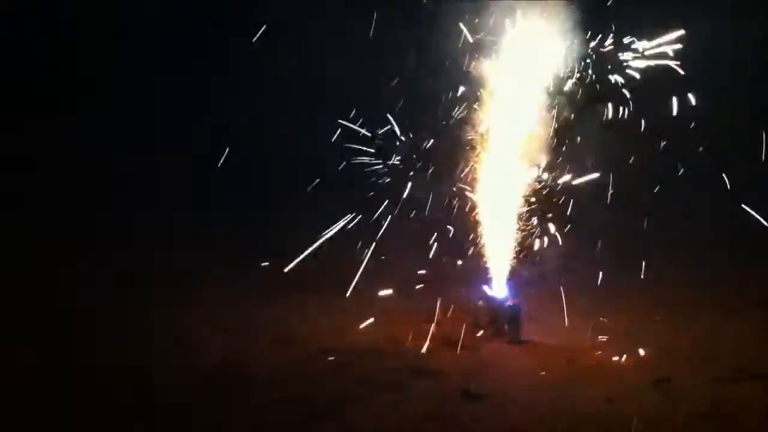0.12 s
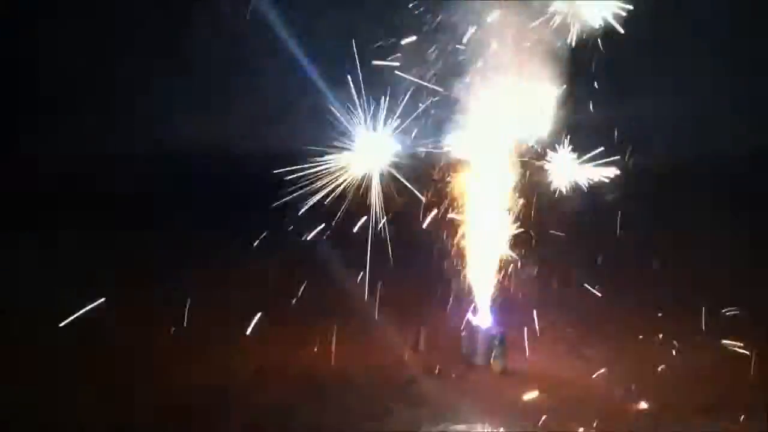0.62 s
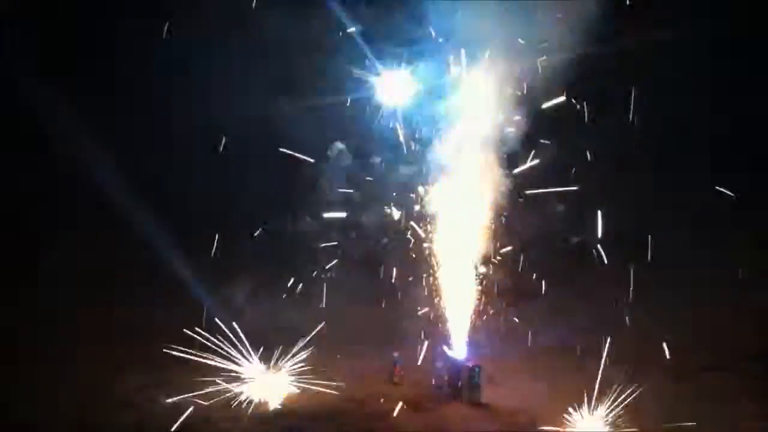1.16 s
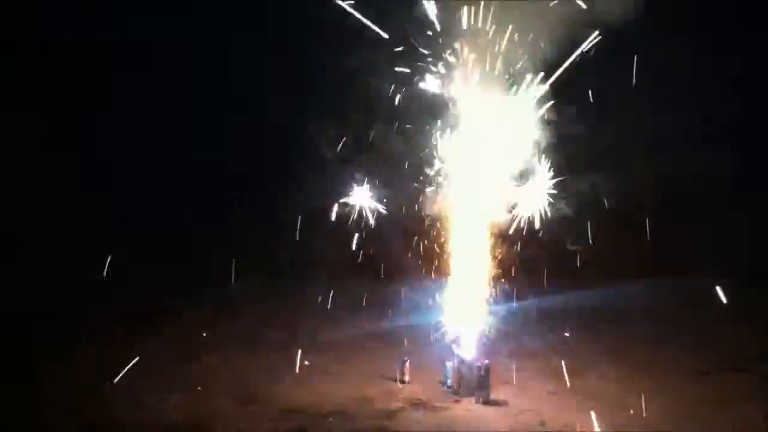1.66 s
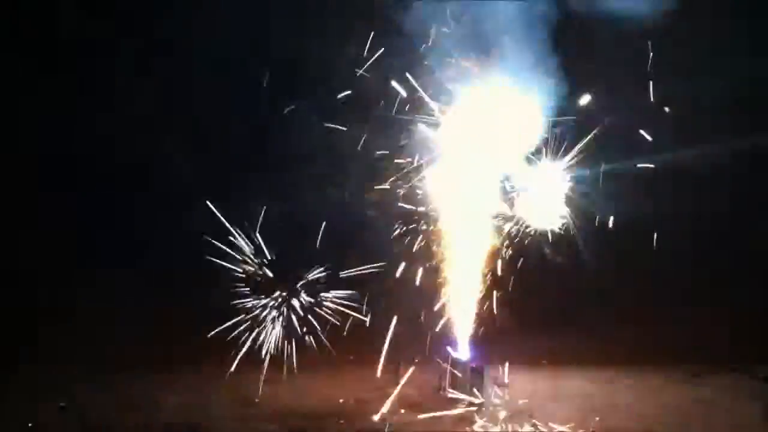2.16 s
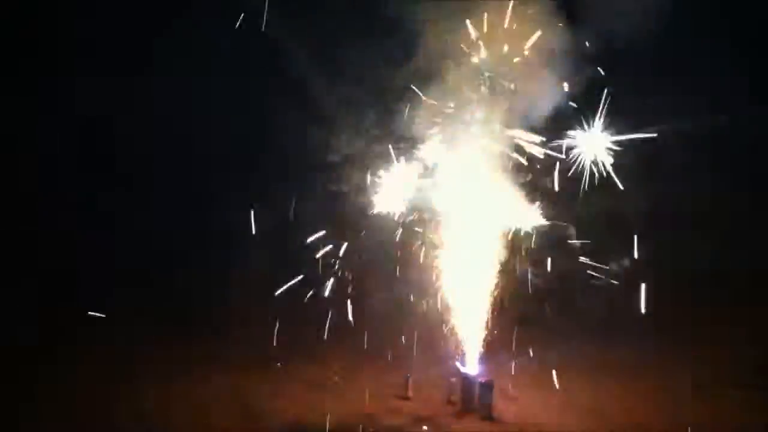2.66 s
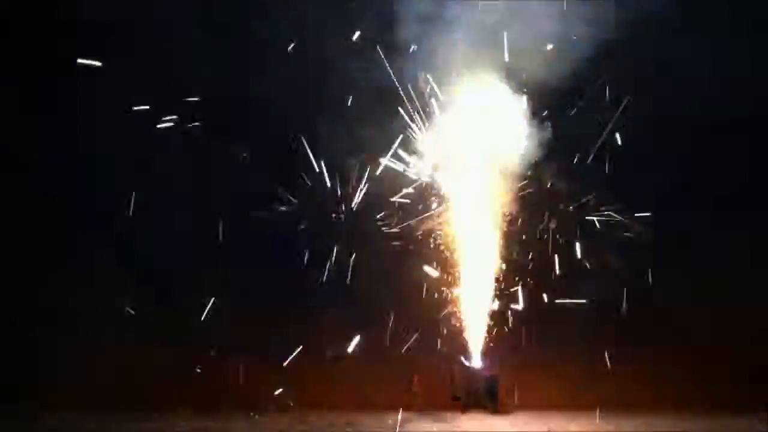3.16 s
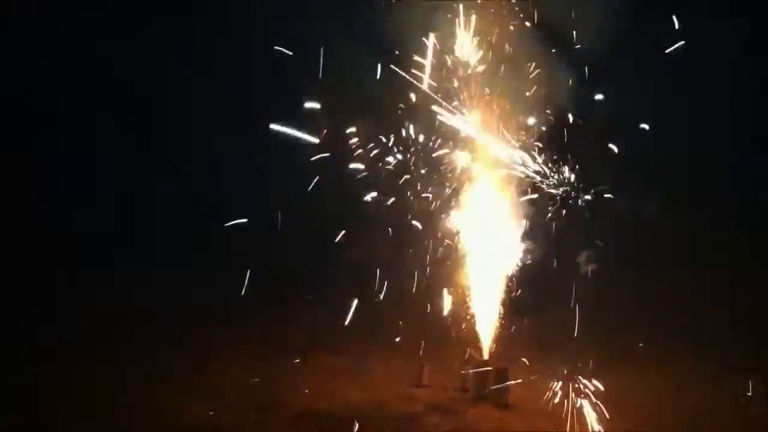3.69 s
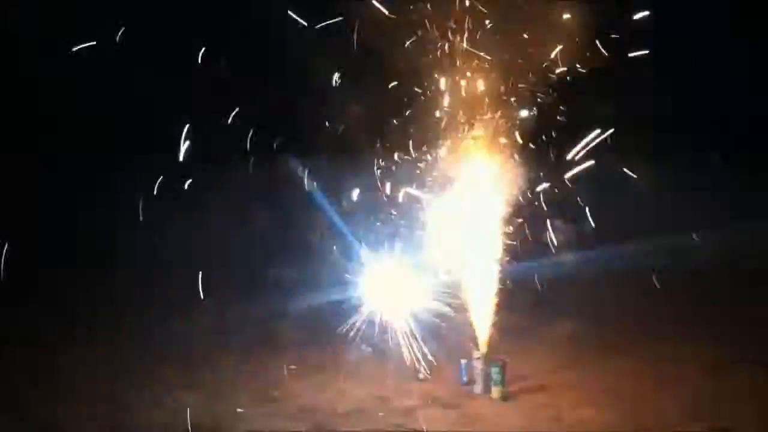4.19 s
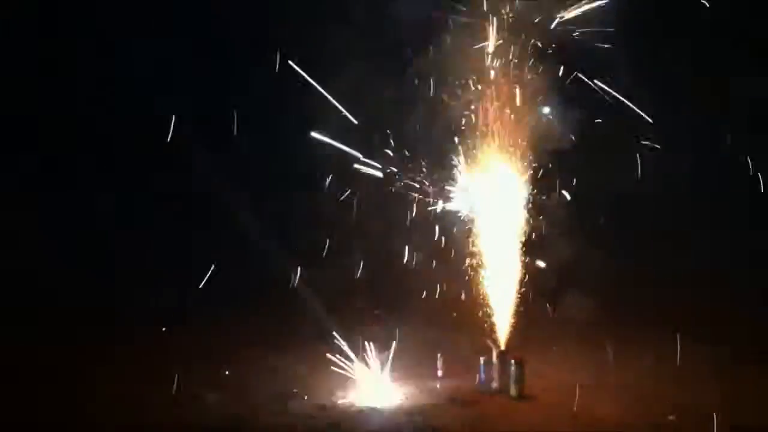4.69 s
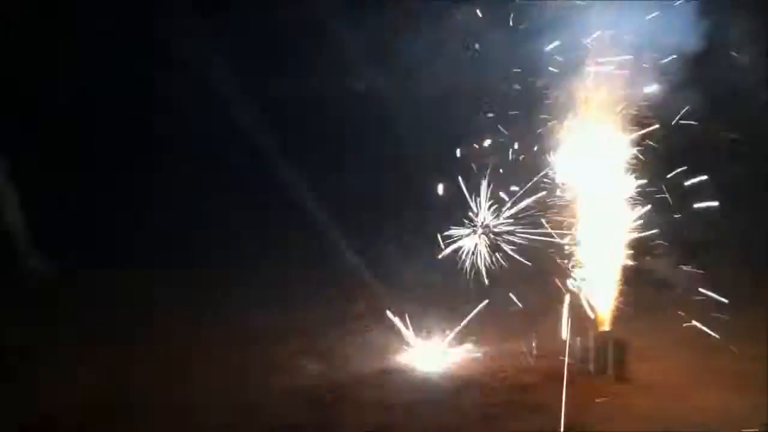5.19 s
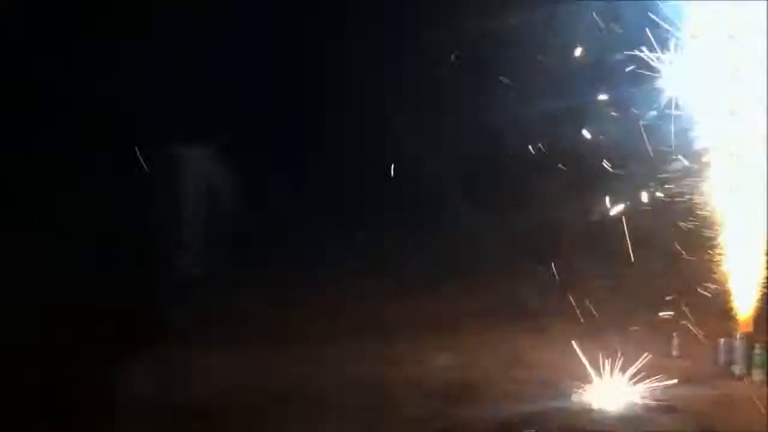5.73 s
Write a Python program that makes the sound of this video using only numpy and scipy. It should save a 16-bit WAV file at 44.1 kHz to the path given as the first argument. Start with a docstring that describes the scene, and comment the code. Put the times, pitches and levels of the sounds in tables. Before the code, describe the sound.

A fountain firework burns on open ground at night, a few metres from a phone microphone. At 0 s an earlier burst is still sizzling away, with a few small crisp ticks. From about 0.2 s the pops grow, and by 0.45 to 1.1 s they are a dense, loud volley of sharp cracks. Things thin briefly around 1.1 to 1.3 s and again at 1.5 to 1.8 s, leaving small ticks and hiss, then irregular clusters resume, rounder and punchier. Each pop is a tight double snap, milliseconds apart, trailing a very short buzz and bright sizzling sparks. An especially hard bang lands near 3.3 s. Strong blasts overload the microphone and add dull, low, quickly ringing thumps. Behind everything run faint distant crackles, a quiet fluttering jet hiss and barely audible low rumble. Dense crackling continues from 4.8 s until the cut at about 5.8 s.

```python
"""A ground fountain firework burns on bare earth at night, a few metres from a phone. An earlier burst is still
sizzling as stars begin to crackle, crisp at first, then mostly rounder. Each snaps twice as a tiny shock, the
ground echo or the louder burst itself coming second, and sprays sizzling sparks shaped from noise. The jet,
fluttering noise, hisses behind. After the loudest shocks the signal thumps off centre and rings low through a
resonant bass cut."""
import sys
import numpy as np
from scipy import signal
from scipy.fft import rfft, irfft
from scipy.io import wavfile
from scipy.ndimage import uniform_filter1d

SR = 44100
rng = np.random.default_rng(int(sys.argv[2]) if len(sys.argv) > 2 else 0)


def generate_wav(sig):
    """Save sig (samples, or channels by samples) to the path in sys.argv[1] as 16-bit PCM at SR."""
    pcm = np.round(np.clip(np.atleast_2d(sig).T, -1, 1) * 32767).astype(np.int16)
    wavfile.write(sys.argv[1], SR, pcm)


def gain_from_db(level_db):
    """Turn a decibel level (scalar or array-like) into a linear amplitude factor."""
    decades = np.asarray(level_db, float) / 20
    return 10 ** decades


N = 257544
TIME = np.arange(N) / SR

# star bursts, relative levels: start_s, peak_db, second_snap_lag_ms,
# second_snap_db (re first; ground echo, or the louder burst itself), spark_spray_db
STAR_BURSTS = [(0.0231, -13.5, 1.3, -10.0, -41), (0.0899, -15, 0.39, -20.0, -46),
               (0.1263, -28, 0.57, -10.0, -43.5), (0.2017, -8, 1.26, 1, -34),
               (0.2359, -8.5, 2.6, -3.5, -37), (0.2944, -6.5, 1.55, -2.5, -33), (0.3108, -4, 3.03, 4, -30),
               (0.4458, -0.5, 1.08, 1, -26), (0.4599, -0.5, 0.26, -3, -28), (0.473, -2, 1.29, -4, -32),
               (0.493, 3.5, 1.7, -8, -27.5), (0.5456, -5.5, 2.97, 4, -31), (0.5784, -9, 3.5, -5, -40),
               (0.5997, -2.5, 1.86, -11, -36), (0.6479, -4, 2.1, -4.5, -26.5),
               (0.6687, -7, 2.4, -12.0, -57.0), (0.6944, -4, 1.32, 10, -23.5),
               (0.7056, 0.0, 1.25, -13, -27), (0.71, -6, 1.6, -13.0, -32), (0.7289, -3.5, 0.97, 8.5, -23),
               (0.7702, -17, 0.59, -5, -29.0), (0.8303, -3.5, 1.7, 0, -18), (0.856, -1, 1.5, -6, -26),
               (0.875, 0, 1.8, 1, -26.5), (0.9257, -4.5, 1.9, -2.5, -30), (0.9739, 0, 2.3, -4.0, -25),
               (0.9806, -15, 0.35, -9.0, -23), (1.0235, -0.5, 2.96, -4, -26.5),
               (1.051, -2.5, 1.5, -15, -29), (1.056, -15, 1.2, -15.0, -34),
               (1.081, -18.0, 0.55, -16.0, -23.5), (1.0895, 0, 1.97, -3, -27),
               (1.1548, -32, 0.33, -9.5, -34), (1.22, -23.5, 0.37, -6, -47), (1.2835, -8.5, 0.6, 3.5, -35),
               (1.3025, 0.5, 1.4, 3.5, -24), (1.3447, -7, 3.6, 8.5, -24), (1.382, -9, 0.89, -9.0, -34),
               (1.3941, 3, 2.2, -9, -23), (1.433, -18, 0.8, -13.0, -37), (1.4757, -12, 0.34, -3.0, -31.5),
               (1.502, 0.5, 2.74, -4, -28), (1.5254, -29, 0.36, -18.0, -31), (1.6357, -18, 0.48, -21, -43),
               (1.7888, -28, 1.2, -14.0, -54), (1.8093, -15.5, 2, -1, -34), (1.823, 1.5, 0.59, -4.5, -28.5),
               (1.8465, -10, 1.3, -9.0, -70.0), (1.8875, 0, 0.7, -3, -27), (1.8911, -0.5, 2.8, -7, -36),
               (1.8959, 0, 0.36, -6, -44.0), (1.917, -1.5, 3, -5, -25.5), (1.9488, -7.5, 1.18, 4.5, -29.5),
               (1.9851, -6.5, 2.9, 1.0, -32.0), (2.0255, -0.5, 2.6, -2.0, -28),
               (2.0515, -21.0, 0.34, -5, -43), (2.0606, -17, 0.5, -10.0, -40),
               (2.0649, -17, 0.32, -13.0, -49.0), (2.0829, 0.5, 2.95, 0.5, -25.5),
               (2.1214, -17.5, 1.74, 5, -39.0), (2.1356, -20, 2.4, -7, -32), (2.2153, -12.5, 1.7, 1, -27.5),
               (2.219, -10.5, 3.0, 3.5, -38.0), (2.2635, -5.5, 1.02, 0, -27),
               (2.2717, -1.5, 2.1, -5.5, -25.5), (2.2762, 4, 1.77, -5, -28), (2.3311, 3, 1.47, -6, -21.5),
               (2.345, -15, 2.8, -6.0, -57.0), (2.3712, -16, 1.27, -2.0, -48),
               (2.411, -19.5, 1.33, -2.0, -46), (2.4648, -16.5, 0.28, -10.0, -63),
               (2.479, -8.5, 1.56, 6.5, -23), (2.515, -0.5, 1.14, -3.5, -25.5),
               (2.5367, -10.0, 1.25, -6.0, -55.0), (2.5595, 2.5, 1.86, -7, -22),
               (2.6156, -9.0, 2.8, -1.0, -32), (2.6329, 0, 2.6, -1.5, -27), (2.639, -3.0, 2.1, -8, -23.5),
               (2.6525, 0.5, 3.96, -5, -36.0), (2.735, -38, 1.4, 2.0, -46), (2.7853, -19.5, 3.8, -2, -53.0),
               (2.8414, -5.5, 3.1, -2, -24), (2.9094, -14.0, 3.17, 1, -37), (2.9291, -16.5, 0.91, 1, -34.5),
               (2.975, -16.5, 0.34, -9.0, -54), (3.004, 0.5, 3.26, -1, -42), (3.0102, -14, 1.3, -5, -26),
               (3.0815, 3.5, 2.4, -6, -23.5), (3.099, -13, 1.6, 0, -49.0), (3.164, -13.0, 1.4, -4.0, -70.0),
               (3.179, -0.5, 1.66, 4, -21), (3.2048, -10, 1.13, -1.0, -21), (3.2451, -12, 1.2, 4.0, -30),
               (3.252, -3, 2.4, -4, -27.5), (3.2634, -1.0, 1.87, -5.0, -22.5),
               (3.312, -21, 0.42, -12.0, -33), (3.3337, 9, 0.89, -7.5, -23.0),
               (3.3793, -8.5, 1.7, -18.0, -36.5), (3.4668, -18, 1.9, -6.5, -49),
               (3.4866, -7.5, 2.5, -5.5, -39), (3.532, -3, 3.2, -8, -35), (3.5604, -0.5, 2.11, -10, -30),
               (3.5708, -8.5, 1.5, 11, -20), (3.6025, -4, 2.26, 3, -26.5), (3.6174, -15, 1.45, -3, -50.0),
               (3.6781, 0.5, 3.13, -3, -21), (3.7054, -1, 3.1, 3.5, -23), (3.756, -6.0, 4, -9, -26),
               (3.8108, -18, 0.66, -14, -37.0), (3.84, -27, 3.6, -8, -34), (3.8835, 1, 2.05, 0.5, -30.5),
               (3.9953, -16, 2.13, -11.0, -38.0), (4.0154, -8.5, 1.47, 9.5, -35),
               (4.034, -30.0, 1.27, 0.0, -38), (4.0476, -11, 2.5, -9.0, -43), (4.0581, -12, 1.4, 2.5, -31),
               (4.0621, -1.5, 0.38, -19.0, -25.0), (4.1138, -4.5, 2.95, -4, -27.5),
               (4.132, -14, 1.5, -11.0, -35.0), (4.1357, -18, 2.2, -9.0, -34),
               (4.1392, -5.5, 3.3, 0.5, -29), (4.1924, -16.5, 0.54, -11.0, -47),
               (4.2214, -18, 3.3, -4, -31.5), (4.2293, -10.5, 3.9, -1.5, -33),
               (4.2485, -4, 0.55, -14.0, -22), (4.2512, 3, 2.4, -1.5, -29),
               (4.3554, -5.5, 2.76, -11, -19.5), (4.4264, -21, 1.1, -1.0, -31),
               (4.4388, -4.5, 2.14, -5.0, -25), (4.4933, -12, 0.6, -4, -29), (4.5291, -6.5, 3.4, -1, -29.5),
               (4.6086, 1, 3.9, 0.5, -24), (4.6699, -13, 1.85, -2.5, -30), (4.6981, -1, 2.7, -0.5, -26.0),
               (4.7426, -18.0, 0.56, -6.0, -40), (4.786, -9.5, 2.7, -3, -28),
               (4.831, -23.0, 0.31, -3.0, -49), (4.8398, -14, 0.45, -9.0, -52),
               (4.8705, -2, 2.6, -1, -23.5), (4.9033, -5.5, 2.1, -15.0, -25), (4.9096, -3, 4.1, -1, -35),
               (4.9303, -8, 3.4, -3, -32), (4.946, -11, 0.4, 2, -43.0), (4.958, -3.5, 1.94, -2.5, -23.5),
               (4.9861, -21, 2.3, -6, -40), (5.0334, -2, 2.1, 5.5, -24), (5.0684, 2, 2.86, -1, -27),
               (5.0834, 0.0, 0.65, 0, -26), (5.1037, 1.5, 1.25, -10, -27.5),
               (5.167, -31, 0.33, -4.0, -41.0), (5.189, -2.5, 3.4, 1.0, -26.5),
               (5.231, -6, 1.84, 9.5, -21.5), (5.251, -8, 3.0, -2, -32.0), (5.313, -16, 1.1, 1, -39),
               (5.321, -30, 0.61, -9.0, -34), (5.33, -18, 3.4, -5, -26), (5.3384, -13, 0.25, -8.0, -34),
               (5.346, -3.5, 1.86, 4.5, -23), (5.3501, -1.5, 1.65, 0, -35), (5.377, -8.5, 2, -11, -34),
               (5.3991, -6, 4.5, -4.5, -34.5), (5.439, -10.5, 0.59, -13, -38.0),
               (5.4417, -1, 2.34, -2, -26.0), (5.454, -3.0, 2, -5.0, -26),
               (5.4794, -18.0, 1.7, -2.0, -42.0), (5.517, -12.5, 0.91, -6.5, -28.5),
               (5.5727, -28.0, 0.45, -10, -36.0), (5.589, -14, 1.7, -2, -29), (5.6016, -0.5, 2.08, 1, -27),
               (5.6526, -12.5, 2.47, -2, -42.0), (5.663, -9.5, 1.65, -2.0, -70.0),
               (5.6936, -9, 1.64, -4, -21), (5.696, -6.5, 1.52, 8.5, -28.5),
               (5.7353, -19.0, 0.31, -7.0, -40.0), (5.754, -24, 1.2, -12.0, -33.5),
               (5.7982, -2.5, 2.8, -2.5, -25.5), (5.826, -18, 2.6, -1.0, -59.0),
               (5.8334, -17.0, 0.6, -13.0, -19.0), (5.8373, -14, 2.47, 4.0, -43.0)]
# blasts and knocks after which the signal thumps off centre: start_s, thump (relative, signed)
HARD_THUMPS = [(0.377, -0.026), (0.5458, -1.35), (0.6475, 0.8), (0.649, -0.54), (0.6956, -0.46),
               (0.7056, -0.051), (0.8303, 0.46), (0.856, -0.89), (0.9733, 0.0088), (1.3012, 0.36),
               (1.3036, -0.55), (1.394, -0.036), (1.8221, 0.25), (2.3324, -0.38), (2.479, 0.47),
               (2.6527, -0.83), (2.8414, 1.0), (2.9314, 0.078), (3.004, 0.15), (3.0812, -0.66),
               (3.2048, 1.2), (3.2635, -0.67), (3.3335, -0.83), (3.3356, -0.37), (3.5709, 0.24),
               (3.6022, 0.091), (3.6781, 0.13), (3.8831, -0.5), (4.0581, 0.45), (4.2509, -0.16),
               (4.3576, 1.01), (4.6134, -0.084), (4.958, -0.44), (5.0835, -0.065), (5.1037, -0.055),
               (5.231, 0.27), (5.6014, -0.58), (5.6936, 0.31), (5.696, 0.6)]


def band(x, hz, width_hz):
    """Two-pole resonance, gain 1 at the centre."""
    return signal.lfilter(*signal.iirpeak(hz, hz / width_hz, SR), x)


def fade(x, tau_s):
    """Every impulse becomes an exponential tail of the same height."""
    return signal.lfilter([1], [1, -np.exp(-1 / (tau_s * SR))], x)


def impulses(start_s, size):
    """Band-limited clicks at times between the samples."""
    out = np.zeros(N + 16)
    at = np.asarray(start_s) * SR
    taps = np.floor(at)[:, None] + np.arange(-7, 9)
    offset = taps - at[:, None]
    kernel = np.sinc(offset) * np.cos(np.pi * offset / 16) ** 2
    np.add.at(out, np.clip(taps, 0, N).astype(int), kernel * np.asarray(size)[:, None])
    return out[:N]


def coloured(points):
    """Noise of rms 1 with a (Hz, dB) spectrum."""
    hz, db = np.transpose(points)
    bin_hz = np.arange(N // 2 + 1) * SR / N
    gain = gain_from_db(np.interp(np.log(bin_hz + 1), np.log(hz), db))
    x = irfft(rfft(rng.standard_normal(N)) * gain, N)
    return x / x.std()


def walk(rate_hz):
    """Slow random wander of spread 1."""
    hold = int(SR / rate_hz)
    steps = np.repeat(rng.standard_normal(N // hold + 1), hold)
    x = uniform_filter1d(steps, hold)[:N]
    return x / x.std()


def sputter(x, share):
    """Single sparks stand out of the noise as tiny ticks, about 900 a second."""
    ticks = (rng.random(N) < 900 / SR) * rng.rayleigh(size=N)
    return x * np.sqrt(1 - share + share * fade(ticks ** 2, 0.00024) * 1.9)


def shock(clicks, push_s=.00004, pull_s=0.00021):
    """Blast shape: a short push, then a longer, shallower suction of about three quarters its area."""
    push = fade(clicks, push_s)
    pull = fade(clicks, pull_s) - fade(clicks, pull_s / 4)
    return push - 0.97 * push_s / pull_s * pull


def stars():
    """Time and peak of the first snap, time of the second and its level re first, spray of every star."""
    start_s, peak_db, lag_ms, second_db, spray_db = np.transpose(STAR_BURSTS)
    return start_s, peak_db, start_s + lag_ms / 1000, second_db, spray_db


def rumble():
    """A faint uneven rumble of night air and handling: low noise that wanders in level."""
    level_db = -78 + 2.7 * walk(8)
    return gain_from_db(level_db) * coloured([(15, 3), (40, 5), (90, 13), (200, -13), (400, -70)])


def jet():
    """Burning gas leaves the tube with a fluttering hiss."""
    # course of the hiss before trim and flutter: start_s, level_db
    jet_course = [(0, -45.5), (1, -54), (1.7, -49.5), (2.7, -52.5), (3.9, -51.5), (4.8, -48), (5.84, -50)]
    # spectrum of the hiss: frequency_hz, level_db
    hiss_colour = [(60, -7), (190, 5.5), (450, 0), (650, -4.5), (1100, -4.5), (1550, 1.5), (2000, 0.5),
                   (2800, 1), (5500, 0), (9000, -10.5), (14000, -11)]
    hiss = sputter(coloured(hiss_colour), .2)
    flutter_db = 2.7 * walk(10.0) + 0.67 * walk(60)
    return hiss * gain_from_db(np.interp(TIME, *np.transpose(jet_course)) - 3 + flutter_db)


def far_ticks(count=350):
    """Small or distant stars: many weak shocks with their own ground echo."""
    chance = rng.random((count, 3))
    start_s = chance[:, 0] * N / SR
    size = gain_from_db(-39.0 - 6.0 * np.log(chance[:, 1]).clip(-3))
    echo_s = start_s + .003 * chance[:, 2]
    return shock(impulses(np.r_[start_s, echo_s], np.r_[size, .7 * size]))


def spray(start_s, peak_db, second_s, second_db, spray_db):
    """Each snap leaves a short buzz of scattered shock, then sparks that sizzle out, the bass first."""
    # spectrum of the sizzle: frequency_hz, level_db
    spray_colour = [(100, -19), (300, 8), (1000, -2), (2500, 3.5), (5000, 5.5), (9000, 1), (11500, 1),
                    (13500, -3.5), (15500, -5)]
    # rough surfaces nearby that scatter each burst back: lag_ms, spread_ms, level_db (re spray)
    surfaces = [(9.5, 2.8, -8.5), (22.8, 1.4, -16.5)]
    second_step_db = second_db.clip(-20, 0)
    power = np.zeros(N)
    np.add.at(power, (start_s * SR).astype(int), gain_from_db(spray_db) ** 2)
    np.add.at(power, (second_s * SR).astype(int), gain_from_db(spray_db + second_step_db) ** 2)
    power[0] = gain_from_db(-23.5) ** 2  # a burst just before the start is still sizzling

    # the buzz follows both the height of the shock and the amount of spray
    buzz_db = 0.19 * peak_db + 0.55 * spray_db - 11
    buzz = impulses(np.r_[start_s, second_s], gain_from_db(2 * np.r_[buzz_db, buzz_db + second_step_db]))
    buzz = np.abs(fade(buzz, 0.0013))

    lag = TIME[:SR // 20] * 1000  # ms
    scatter = sum(gain_from_db(db) ** 2 * np.exp(-((lag - ms) / spread) ** 2) for ms, spread, db in surfaces)
    returns = np.abs(signal.fftconvolve(power, scatter)[:N])

    noise = sputter(coloured(spray_colour), .25) * gain_from_db(1.5 * walk(200))
    low = signal.sosfilt(signal.butter(2, 1800, fs=SR, output="sos"), noise)
    top = signal.sosfilt(signal.butter(2, 6500, "high", fs=SR, output="sos"), noise)
    middle = noise - low - top
    # the top of the sizzle swells and thins apart from its middle
    high = gain_from_db(2.5 * walk(45)) * top + gain_from_db(1.55 * walk(45)) * middle

    bright_power = gain_from_db(11.0) ** 2 * buzz + gain_from_db(-4.5) ** 2 * fade(power, 0.013) + returns
    dull_power = gain_from_db(14.5) ** 2 * buzz + gain_from_db(-6) ** 2 * fade(power, 0.0062) + returns
    return gain_from_db(-7.5) * (high * np.sqrt(bright_power) + low * np.sqrt(dull_power))


def late_snaps(start_s, peak_db, second_s, second_db, spray_db, count=6):
    """A few burning fragments of each star snap on their own a moment later."""
    delay_s = .02 * rng.exponential(size=(len(start_s), count))
    scatter_db = 3 * rng.standard_normal((len(start_s), count))
    size = gain_from_db(spray_db[:, None] + 0.5 + scatter_db)
    return shock(impulses((second_s[:, None] + delay_s).ravel(), size.ravel()))


def heavy_blasts(start_s, peak_db, second_s, second_db, spray_db):
    """The stars that thump carry more charge: a longer push gives a midrange punch."""
    jolt_s, jolt = np.transpose(HARD_THUMPS)
    together = np.abs(start_s[:, None] - jolt_s) < .003
    charge = (together * np.abs(jolt)).max(axis=1)
    size = np.tile(charge, 2) * gain_from_db(np.r_[peak_db, peak_db + second_db] - 4.5)
    return shock(impulses(np.r_[start_s, second_s], size), push_s=0.00015, pull_s=.0006)


def bursts(start_s, peak_db, second_s, second_db, spray_db):
    """Each star snaps twice, each time as a mix of a sharp and a longer, rounder shock."""
    # crisp at first, rounder later: start_s, rounded_share (0-1, before the scatter from star to star)
    roundness = [(0, 0), (.5, 0.1), (1.2, 1), (2.3, 0.46), (3.7, 1), (5.84, 0.53)]
    at = np.r_[start_s, second_s]
    size = gain_from_db(np.r_[peak_db, peak_db + second_db])
    scatter = 0.53 * (rng.random(len(start_s)) - .5)
    round_share = np.interp(start_s, *np.transpose(roundness)) + scatter
    round_share = np.tile(round_share.clip(0, 1), 2)
    sharp = shock(impulses(at, size * (1 - round_share)), push_s=.00003, pull_s=.00008)
    rounded = shock(impulses(at, size * round_share), push_s=.00006, pull_s=0.00041)
    return gain_from_db(2.0) * (gain_from_db(-0.5) * sharp + rounded)


def port(x):
    """The sound port rings at its modes, cancels just above the sharpest one and rolls off at the top."""
    # resonances of the microphone port: frequency_hz, width_hz, level_db
    port_modes = [(837, 180, -7.5), (1370, 430, -7), (2590, 620, -8.5), (4654, 466, 5), (8740, 4140, 5)]
    x = x + sum(gain_from_db(db) * band(x, hz, width_hz) for hz, width_hz, db in port_modes)
    x = x - 0.46 * band(x, 5110, 1120)
    return signal.sosfilt(signal.butter(2, 11200, fs=SR, output="sos"), x)


def thumps():
    """Just after an overloading shock the signal jumps off centre, snaps partly back, creeps."""
    jolt_s, jolt = np.transpose(HARD_THUMPS)
    star_s, peak_db = np.transpose(STAR_BURSTS)[:2]
    nudge = -gain_from_db(peak_db - 31)  # every burst also pushes the signal a little off centre
    kick = impulses(np.r_[jolt_s, star_s] + .00012, np.r_[jolt, nudge])
    creep, snap_back = fade(kick, 0.0017), fade(kick, 0.00016)
    return fade(creep + 0.93 * snap_back, .00006) / 4


def bass_cut(x):
    """A resonant high-pass that rings after each thump, then a rumble filter."""
    cut_hz, cut_q, rumble_hz = 168, 1.29, 100
    w = 2 * np.pi * cut_hz
    x = signal.lfilter(*signal.bilinear([1, 0, 0], [1, w / cut_q, w * w], SR), x)
    return signal.sosfilt(signal.butter(2, rumble_hz, "high", fs=SR, output="sos"), x)


def scene():
    """The air at the microphone, through its port, with the low thumps added."""
    star = stars()
    air = bursts(*star) + heavy_blasts(*star) + late_snaps(*star) + spray(*star) + far_ticks() + jet()
    return (port(air) + thumps())[None]


def band_limit(x):
    """A steep low-pass at the top of the band."""
    return signal.sosfilt(signal.butter(12, 16810, fs=SR, output="sos"), x)


def record(dry):
    """Bass cut, added rumble, peaks rounded below full scale, then a steep top cut."""
    x = bass_cut(dry) + rumble()
    x = x / (1 + np.abs(x / .97) ** 6) ** (1 / 6)
    x = signal.sosfilt(signal.cheby1(10, 1, 15700, fs=SR, output="sos"), x)
    return band_limit(x)


dry = scene()
out = record(dry)
generate_wav(out)
```